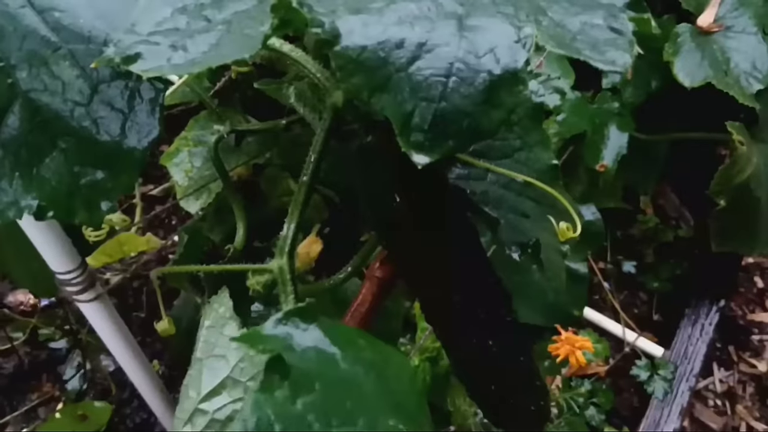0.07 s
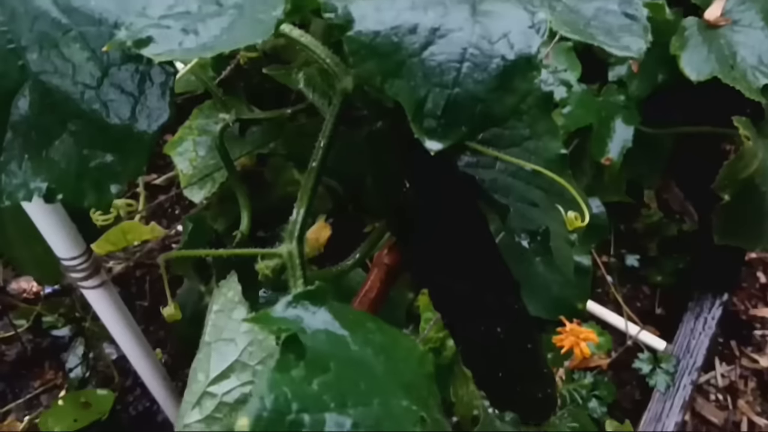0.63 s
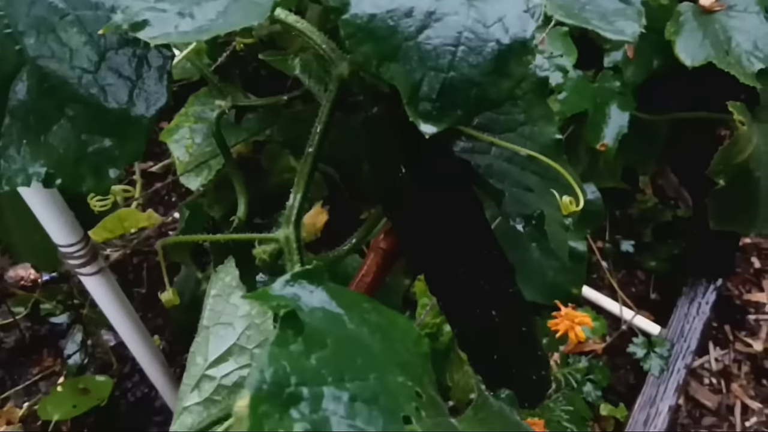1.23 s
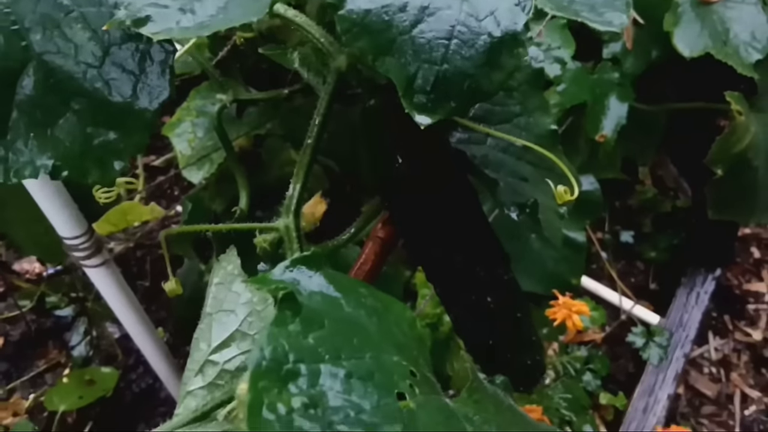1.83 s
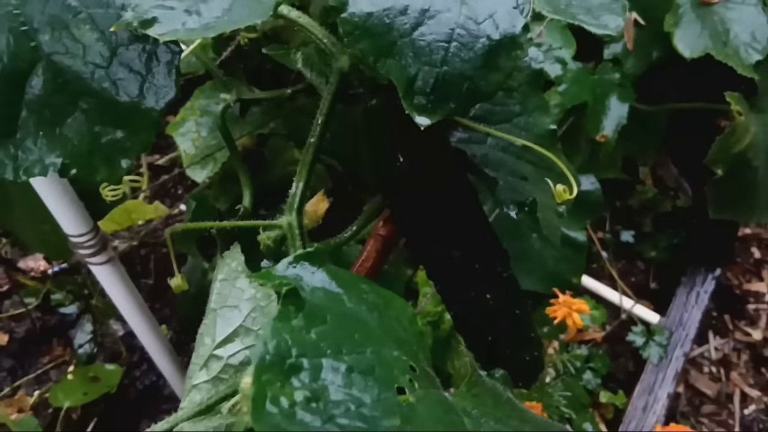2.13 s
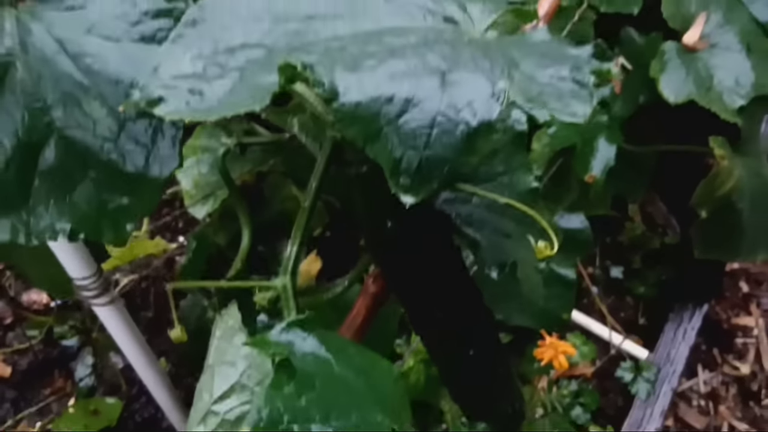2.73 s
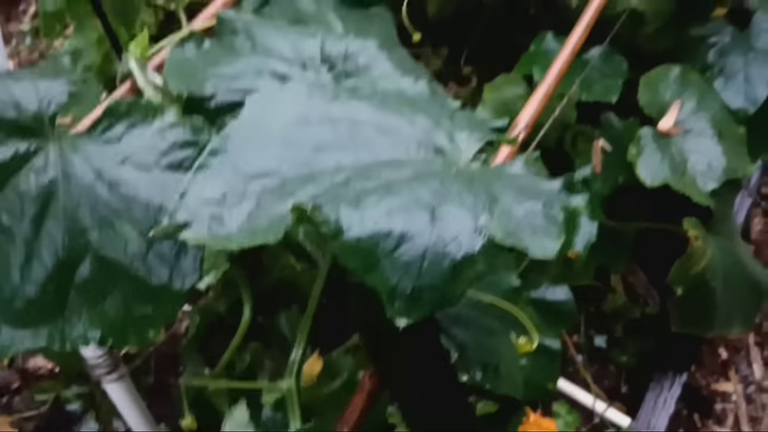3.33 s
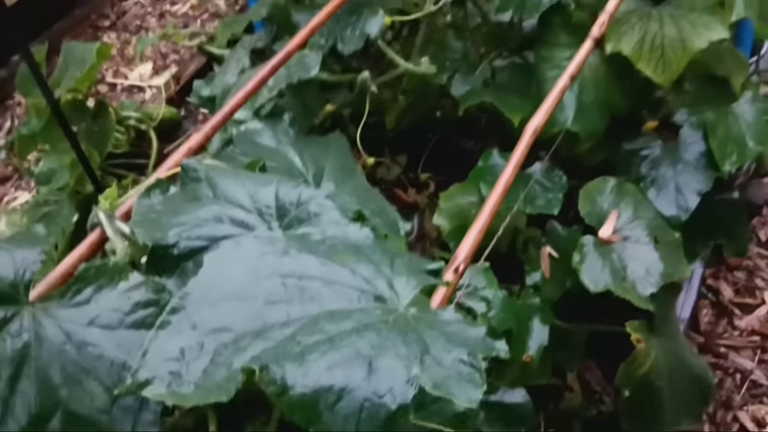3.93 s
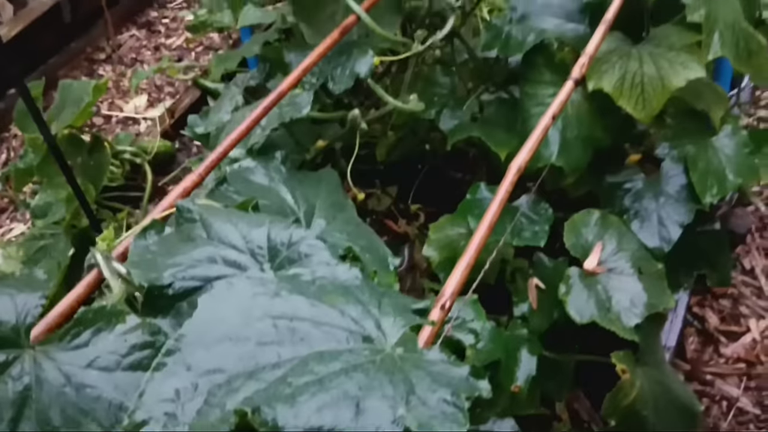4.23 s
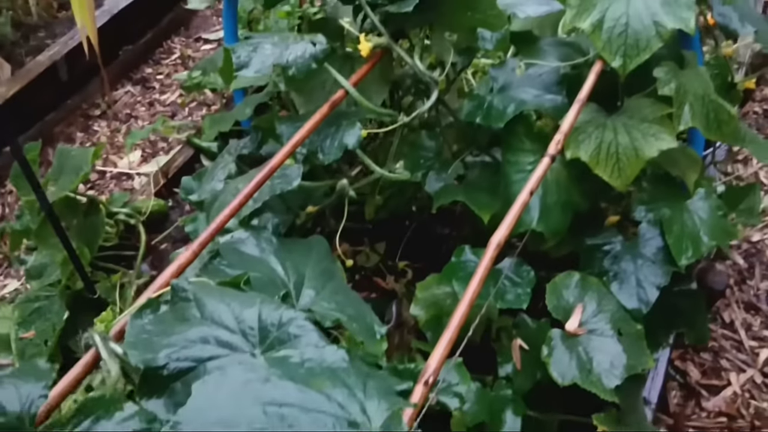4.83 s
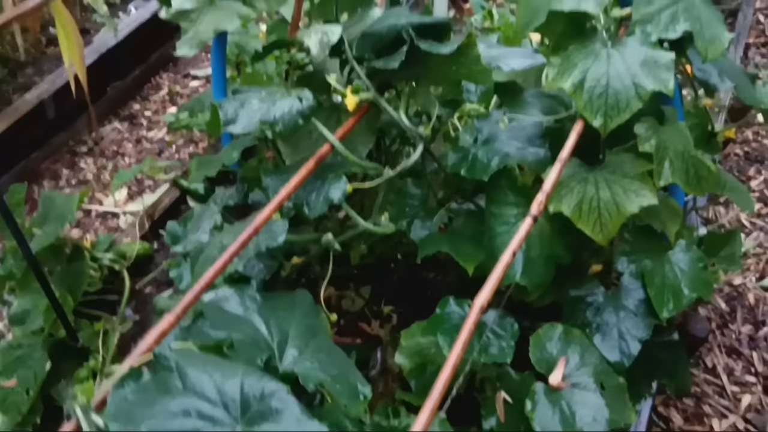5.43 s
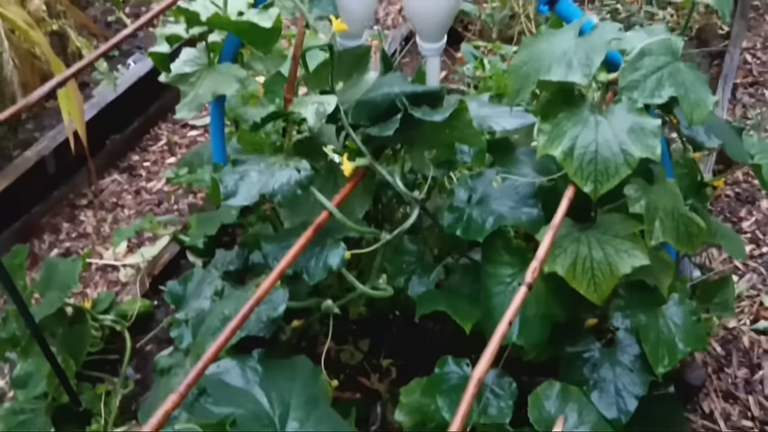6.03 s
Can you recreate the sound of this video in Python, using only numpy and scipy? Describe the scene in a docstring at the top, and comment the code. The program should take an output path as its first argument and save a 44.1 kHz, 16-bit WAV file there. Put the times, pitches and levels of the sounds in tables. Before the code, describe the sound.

Steady rain falls on a vegetable garden, distant drops blending into an even hiss while nearer ones patter and splash on broad leaves. Single sharp drips tick close by, left and right, with a few dull plops. A low outdoor rumble lies underneath, and the hand holding the microphone adds faint rubbing and occasional soft thumps. The rain eases only slightly.

```python
"""A vegetable garden in steady rain, heard from a hand-held camera.
Countless far drops blur into a wash, while near ones tick, splash and plop on broad leaves.
Underneath lie a low outdoor rumble and the rubs and soft thumps of the hand on the case.
The sound enters through two microphone openings, left and right, and each rings in its own way."""
import sys
import numpy as np
from scipy import signal
from scipy.fft import rfft, irfft
from scipy.io import wavfile
from scipy.ndimage import uniform_filter1d

SR = 44100
rng = np.random.default_rng(int(sys.argv[2]) if len(sys.argv) > 2 else 0)


def unload_wav(signal):
    """Save mono or channel-first audio to the path in sys.argv[1] as 16-bit WAV at rate SR, clipped to [-1, 1]."""
    wavfile.write(
        sys.argv[1],
        SR,
        np.round(np.clip(np.atleast_2d(signal).T, -1, 1) * 32767).astype(np.int16),
    )


N = 268348
TIME = np.arange(N) / SR
HZ = np.fft.rfftfreq(N, 1 / SR)


def gain_of(db):
    """Turns decibels into a number to multiply a sound by."""
    return 10 ** (np.asarray(db) / 20)


def unit_level(x):
    """Scales a signal so that its average size (rms) is 1."""
    return x / np.sqrt(np.mean(x ** 2) + 1e-20)


def wander(shape, steps):
    """A random curve that drifts up and down; more steps make it slower."""
    return unit_level(uniform_filter1d(rng.standard_normal(shape), size=steps))


def at_pitch(rows, hz):
    """Looks up a table at any frequency, sliding smoothly between its rows."""
    row_hz, value = np.transpose(rows)
    return np.interp(np.log(hz + 1), np.log(row_hz + 1), value)


def over_time(rows):
    """Joins a table's levels with straight lines, giving one for every sample."""
    return np.interp(TIME, *np.transpose(rows))


def add(mix, start_s, sound):
    """Mixes a sound in at the given time."""
    part = mix[max(round(start_s * SR), 0):][:len(sound)]
    part += sound[:len(part)]


def colour(x, rows):
    """Makes some frequencies louder and others softer; the peaks ring after each click."""
    log_gain = np.log(gain_of(at_pitch(rows, abs(np.fft.fftfreq(4096, 1 / SR)))))
    click_response = np.fft.ifft(np.exp(np.conj(signal.hilbert(log_gain)))).real[:2048]
    return signal.oaconvolve(x, click_response)[:N]


def stereo_noise(tone, alike, left_late_s=0):
    """Noise with the given tone, partly the same on both sides."""
    right, own = rfft(rng.standard_normal((2, N)))
    left = alike * right + np.sqrt(1 - alike ** 2) * own
    left *= np.exp(-2j * np.pi * HZ * left_late_s)
    return unit_level(irfft(np.array([left, right]) * gain_of(at_pitch(tone, HZ)), N))


# How hard it rains, far and near. Each row: time in seconds, relative level in dB.
RAIN_STRENGTH = [(0.0, -33), (2.7, -36), (5.1, -35.5), (5.8, -37.5), (6.08, -37.5)]
# The deepest part of the far rain's roar. Each row: time in seconds, relative level in dB.
ROAR_STRENGTH = [(0.0, -64.5), (1.07, -64), (1.55, -75), (3.3, -72), (4.9, -69), (6.08, -67.5)]
# The tone of the far rain. Each row: frequency in Hz, relative level in dB.
FAR_RAIN_TONE = [(120, -64), (300, -33), (350, -23), (420, -14), (520, -4), (780, 2.5), (1000, -3),
                 (1300, -2), (1800, -8), (4000, -11.5), (8000, -14), (16000, -23)]
# How alike it is on the two sides. Each row: frequency in Hz, likeness from 0 (unrelated) to 1 (same).
FAR_RAIN_LIKENESS = [(200, 1), (520, 0.65), (720, 0.35), (900, 0), (1350, 0.3), (2000, 0), (4000, 0.07)]


def far_rain(level_db=-35.5, patchy_db=1.27, waver_db=2):
    """Countless far drops merge into a wash; its treble flickers and its low roar wavers."""
    wash = stereo_noise(FAR_RAIN_TONE, at_pitch(FAR_RAIN_LIKENESS, HZ), left_late_s=0.0009185)
    hz, t, grid = signal.stft(wash, SR, nperseg=512, noverlap=384)  # split by frequency and time
    patches = uniform_filter1d(rng.standard_normal(grid.shape[1:]), size=10, axis=0)
    patches = unit_level(uniform_filter1d(patches, size=14, axis=1))
    flicker, waver = wander((2, len(t)), steps=14)
    curves = over_time(RAIN_STRENGTH), over_time(ROAR_STRENGTH)
    rain_change, roar_change = (np.interp(t, TIME, curve - curve.mean()) for curve in curves)
    treble_share = at_pitch([(700, 0.067), (3000, 0.85)], hz)[:, None]
    bass_share = at_pitch([(380, 0.99), (560, 0.024)], hz)[:, None]
    treble_db = treble_share * (rain_change + 1.18 * flicker)
    bass_db = bass_share * (roar_change + waver_db * waver)
    grid *= gain_of(treble_db + bass_db + patchy_db * patches)
    return gain_of(level_db) * signal.istft(grid, SR, nperseg=512, noverlap=384)[1][:, :N]


def leaf_tick(hz, cycles, spray, spray_s):
    """One drop: the leaf rings for a cycle or so, then fine spray lands around it."""
    t = np.arange(1500) / SR
    ring = np.diff(np.exp(-t * hz / cycles) * np.sin(2 * np.pi * hz * t), prepend=0)
    ring /= np.linalg.norm(ring)
    droplets = rng.standard_normal(len(t)) ** 3 * np.exp(-t / spray_s)
    return ring + spray * np.convolve(ring, droplets / np.linalg.norm(droplets))[:len(t)]


def patter(per_s, gain_db, spread_db, range_hz, leaves, cycles, spray, spray_s):
    """Drops of many sizes land on leaves all around; each leaf has its own pitch and direction."""
    out = np.zeros((2, N))
    for hz in np.geomspace(*range_hz, leaves):
        chance = rng.random(N) * SR * leaves / per_s
        side = rng.uniform(-1, 1)
        lands = chance < 1
        drops = np.zeros(N)
        drops[lands] = gain_of(spread_db * np.minimum(-np.log(chance[lands]), np.e))  # big ones are rare
        leaf = signal.oaconvolve(drops, leaf_tick(hz, cycles, spray, spray_s))
        for mic, sign in enumerate((1, -1)):  # the farther microphone hears it later and softer
            add(out[mic], 0.0007 * (1 + sign * side), leaf * gain_of(-sign * 1.7 * side))
    thin = [(200, -45), (450, -20), (900, -3), (2400, -9)]  # small leaves give off little bass
    out = unit_level(np.array([colour(x, thin) for x in out]))
    return gain_of(gain_db + over_time(RAIN_STRENGTH)) * out


# The tone of the rumble. Each row: frequency in Hz, relative level in dB.
RUMBLE_TONE = [(10, -29), (25, -4.5), (45, -5.5), (62, 6.5), (85, -5), (115, -11), (160, -29), (220, -35),
               (320, -35), (700, -73)]


def rumble(start_db=-41.0, fade_db_per_s=0.38, swell_db=1.2):
    """A low outdoor rumble, a little to the left, swells at random as it slowly sinks."""
    noise = stereo_noise(RUMBLE_TONE, alike=0.66)
    level_db = start_db - fade_db_per_s * TIME + swell_db * wander(N, steps=9000)
    return gain_of(level_db) * noise * gain_of([[0.65], [-0.65]])


# The tone of fingers rubbing the case. Each row: frequency in Hz, relative level in dB.
RUB_TONE = [(10, -22), (30, -4.5), (70, -1), (110, 3.5), (160, -7.5), (220, -14.5), (300, -33), (700, -62)]
# How hard they rub between thumps. Each row: time in seconds, level on the right in dB.
RUB_STRENGTH = [(0.0, -45), (2.8, -47), (6.08, -58.5)]


def finger_rub(lumpy_db=5.0, left_db=-5, rise_s=0.036, settle_s=0.14):
    """Fingers shift unevenly on the case; after each thump they rub harder, then settle."""
    since_thump = np.maximum(TIME - np.array(HAND_THUMPS)[:, :1], 0)
    unrest = (np.minimum(since_thump / rise_s, 1) * np.exp(-since_thump / settle_s)).max(axis=0)
    lumps = gain_of(lumpy_db * np.tanh(wander(N, steps=2500)))
    rub = unit_level(stereo_noise(RUB_TONE, alike=0.6) * lumps)
    return gain_of(over_time(RUB_STRENGTH) + 5.5 * unrest) * rub * gain_of([[left_db], [0]])


# The loudest drops close by. Each row: start in seconds, relative strength in dB, pitch in Hz,
# how much louder on the left than on the right in dB.
NEAR_DRIPS = [(0.0664, -11, 4000, -4), (0.1066, -10, 3500, 3), (0.5304, -10, 6100, -4),
              (0.775, -12, 3600, 9), (1.201, -11, 1500, 0), (1.2889, -13, 4940, -3), (1.788, -13, 3450, -3),
              (2.1865, -14, 10570, 15), (2.4546, -13, 3510, 1), (2.6242, -11, 5250, -5),
              (2.8082, -10.5, 3850, 3), (3.068, -12, 3200, -7), (3.1736, -12.5, 3960, 2),
              (3.5444, -12.5, 5340, -1), (4.2078, -8, 9100, 11), (4.4876, -9.5, 4110, -6),
              (4.726, -12, 2960, -5), (5.252, -11, 1700, -2)]


def near_drips(gain_db=3.0, ring_s=0.00016, spray_s=0.004, left_late_s=0.00104):
    """Big drops slap the nearest leaves and spray; tiny ones give a cleaner, higher tick."""
    out = np.zeros((2, N))
    for start_s, db, hz, pan_db in NEAR_DRIPS:
        spray = 1.67 * at_pitch([(5000, 0.86), (9000, 0.28)], hz)
        for mic, sign in enumerate((1, -1)):
            drop = leaf_tick(hz, hz * ring_s, spray, spray_s)
            drop *= gain_of(db + gain_db + sign * pan_db / 2) / np.linalg.norm(drop)
            add(out[mic], start_s + left_late_s * (mic == 0), drop)
    return out


def swing(t, hz, rise_s):
    """A soft vibration that grows for rise_s seconds, then quickly dies away."""
    return t / rise_s * np.exp(1 - t / rise_s) * np.sin(2 * np.pi * hz * t)


# Bumps of the hand. Each row: start in seconds, relative level in dB, pitch in Hz, rise in seconds.
HAND_THUMPS = [(0.274, -23, 56, 0.011), (0.52, -28.5, 78, 0.0069), (0.625, -26, 50, 0.015),
               (1.972, -21.5, 48, 0.0097), (3.145, -25, 44, 0.0086), (3.258, -29, 76, 0.0047),
               (4.066, -25, 63.6, 0.0067), (5.216, -22, 57.4, 0.0046)]


def hand_thumps(gain_db=7, left_db=-16):
    """The hand nudges the case near the right microphone, and it swings for a few cycles."""
    out, t = np.zeros(N), np.arange(SR // 5) / SR
    for start_s, db, hz, rise_s in HAND_THUMPS:
        add(out, start_s - 0.003, gain_of(db + gain_db) * swing(t, hz, rise_s))
    muffled = [(15, -27), (40, -10.0), (150, 4.5), (320, -19), (800, -63)]
    return colour(out, muffled) * gain_of([[left_db], [0]])


# Dull plops of big drops. Each row: start in seconds, relative level in dB, pitch in Hz.
LEAF_PLOPS = [(1.192, -42.5, 175), (1.731, -47.5, 218), (4.461, -47.5, 174)]


def leaf_plops(gain_db=3, rise_s=0.0056):
    """A broad leaf flaps a few times under a heavy drop."""
    out, t = np.zeros(N), np.arange(SR // 8) / SR
    for start_s, db, hz in LEAF_PLOPS:
        add(out, start_s, gain_of(db + gain_db) * swing(t, hz, rise_s))
    return out


def scene():
    """Far rain and four kinds of patter, with rumble, single drops and the hand's noises."""
    fine = patter(per_s=1500, gain_db=-5.0, spread_db=3.0, range_hz=(2000, 12400), leaves=48,
                  cycles=1.3, spray=0.61, spray_s=0.0043)
    pats = patter(per_s=200, gain_db=-13, spread_db=2.0, range_hz=(544, 1780), leaves=16,
                  cycles=0.71, spray=0.42, spray_s=0.0045)
    splashes = patter(per_s=200, gain_db=-8.5, spread_db=3.0, range_hz=(2940, 6100), leaves=32,
                      cycles=0.68, spray=1.15, spray_s=0.0071)
    taps = patter(per_s=14, gain_db=-12, spread_db=0.5, range_hz=(1850, 5000), leaves=12,
                  cycles=0.7, spray=1.3, spray_s=0.01)
    rain = far_rain() + fine + pats + splashes + taps + near_drips() + leaf_plops()
    return rain + rumble() + finger_rub() + hand_thumps()


# How each microphone opening changes the tone. Each row: frequency in Hz, boost or cut in dB.
LEFT_MIC_TONE = [(350, 1), (700, -1), (1800, 1.06), (2700, 3.5), (3450, 10), (4100, 6.5), (5250, -6.5),
                 (6000, 0.5), (6850, 13), (7300, 7.5), (8500, 5.5), (11000, -13), (13200, -16.5),
                 (15700, -5.5)]
RIGHT_MIC_TONE = [(350, 3.5), (700, -0.14), (1800, 1), (3500, -0.5), (5300, -2.5), (6900, 1), (7300, -1.5),
                  (8400, 1), (9600, 6.5), (11500, -1.9), (13500, -4.5), (15700, -12)]


def record(dry):
    """Each microphone opening rings in its own way; then the highest treble is cut off."""
    heard = np.array([colour(dry[0], LEFT_MIC_TONE), colour(dry[1], RIGHT_MIC_TONE)])
    treble_cut = signal.firwin(511, cutoff=15900, window=("kaiser", 9), fs=SR)
    return signal.oaconvolve(heard, treble_cut[None], "same")


dry = scene()
out = record(dry)
unload_wav(out)
```